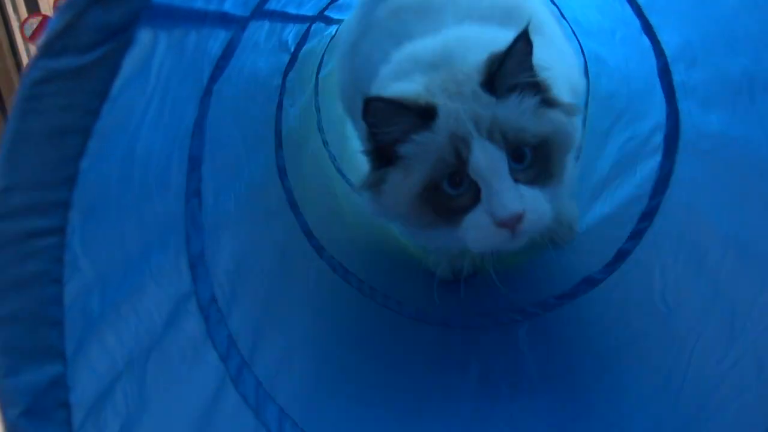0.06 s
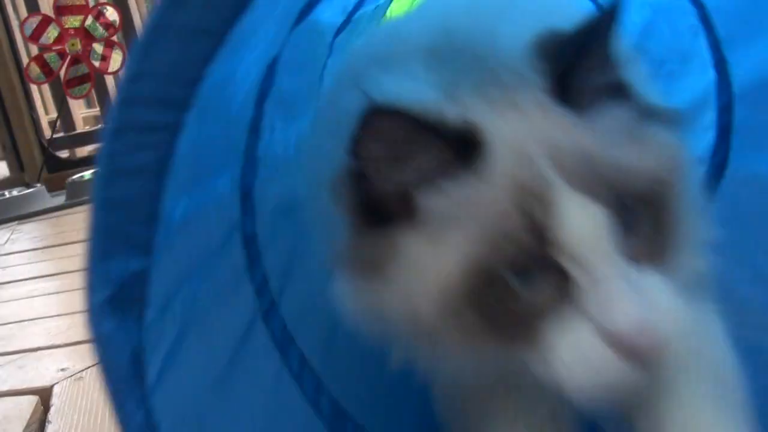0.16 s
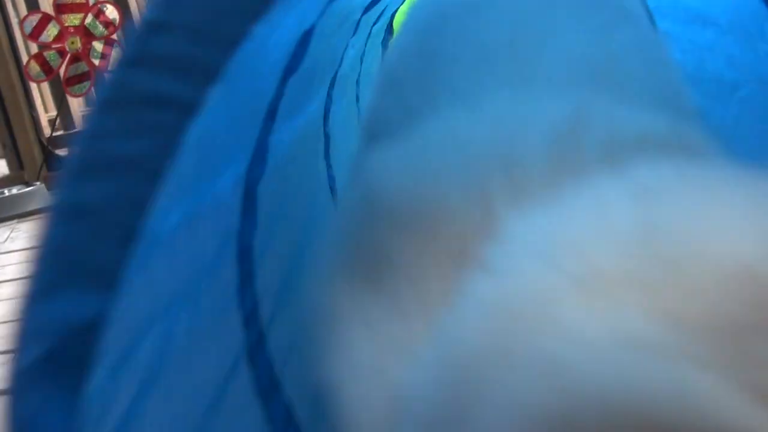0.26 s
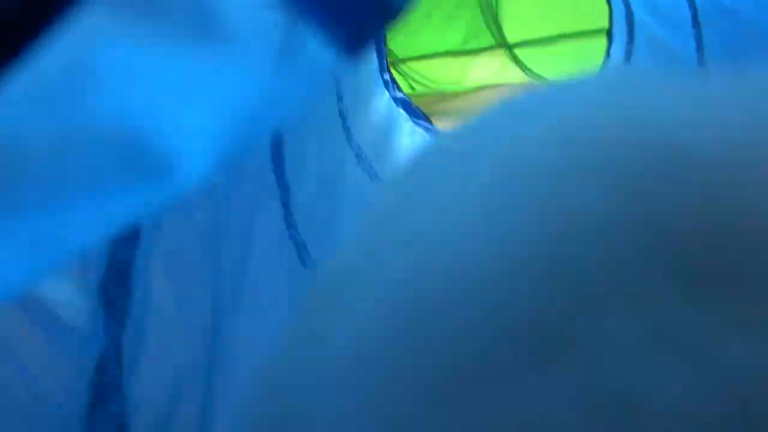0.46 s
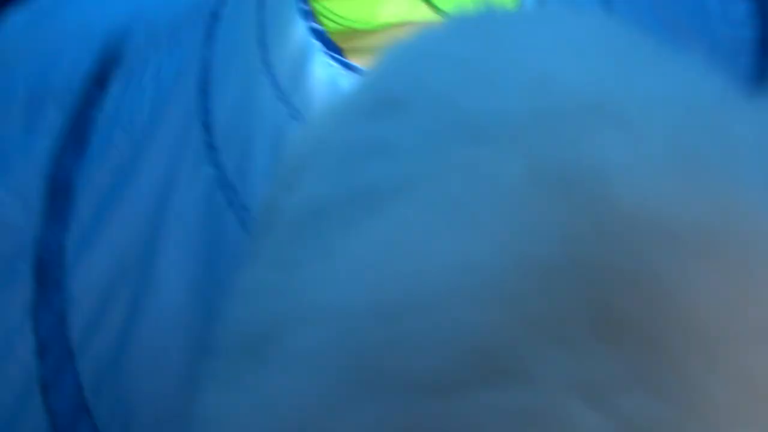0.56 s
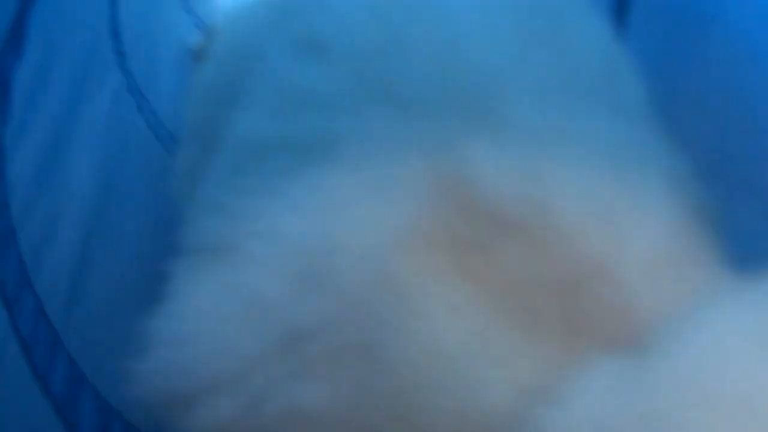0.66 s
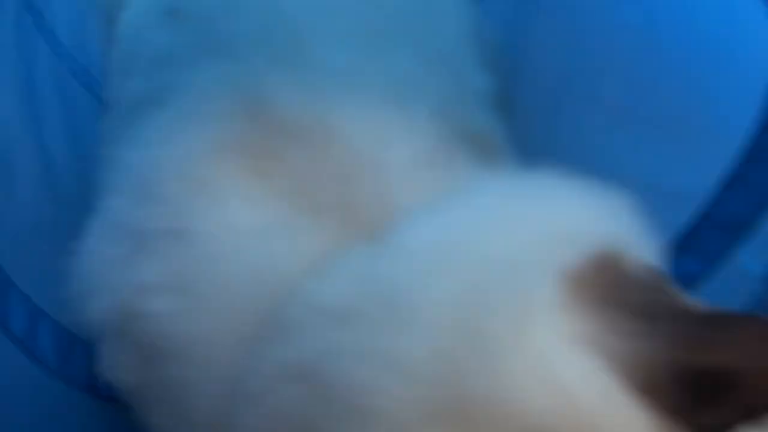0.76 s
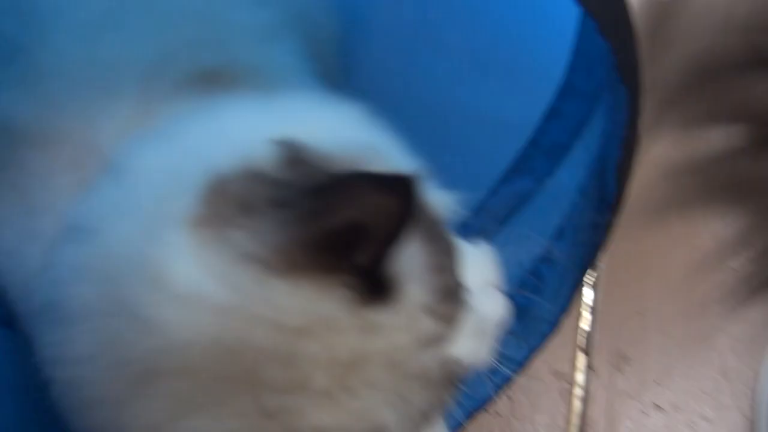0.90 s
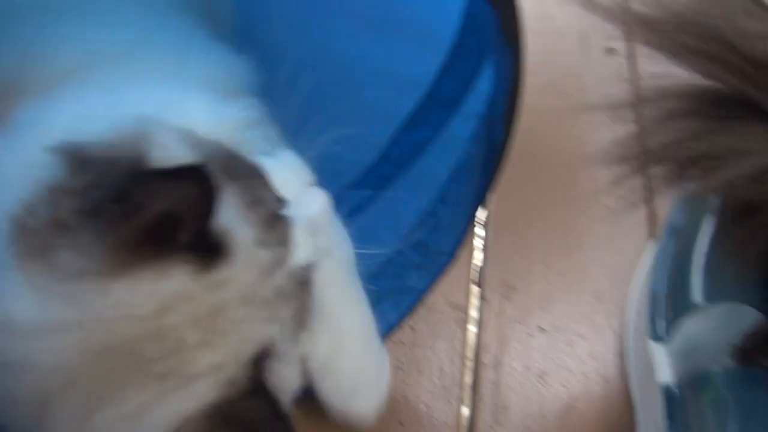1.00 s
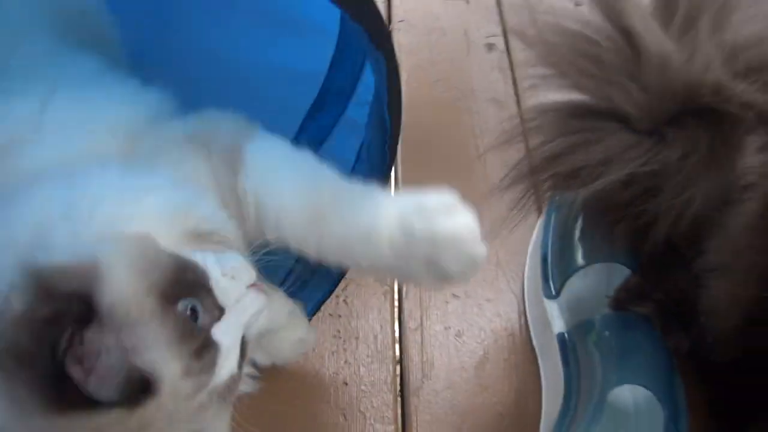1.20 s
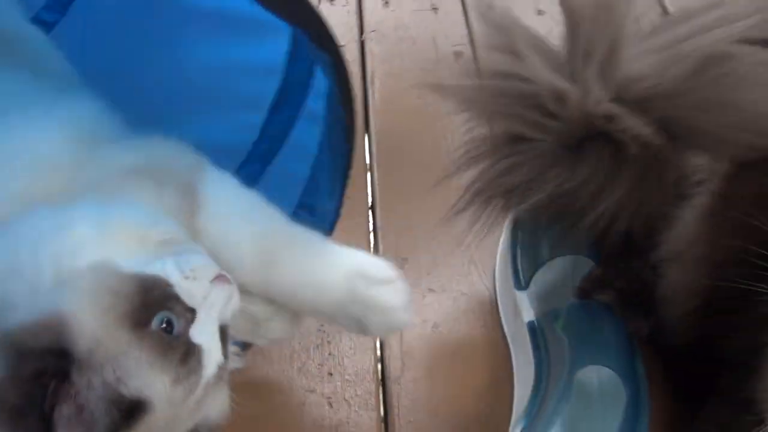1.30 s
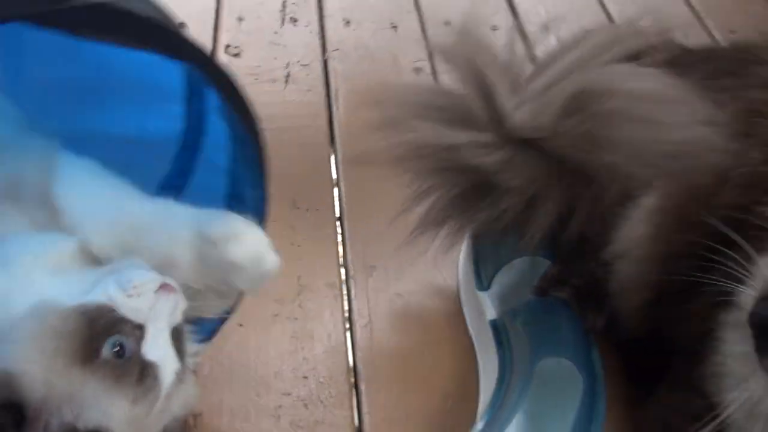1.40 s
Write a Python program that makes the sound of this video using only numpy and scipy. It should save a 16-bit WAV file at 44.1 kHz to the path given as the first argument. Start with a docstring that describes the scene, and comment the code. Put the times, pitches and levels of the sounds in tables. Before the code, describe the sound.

A fabric tunnel rustles and snaps under a running cat, with soft paw thuds.

```python
"""A cat dashes out of a nylon play tunnel on a wooden deck.
Its body rubs the cloth, which crackles, snaps taut and booms hollowly; its paws thud on the boards.
Then fur brushes softly and one claw scratches and ticks on the wood. A distant machine hums outdoors.
Rubbing is made of many tiny slips plus smooth noise, thuds and cracks are short bursts of noise,
and the booms, the tick and the hum are plain tones."""
import sys
import numpy as np
from scipy import signal
from scipy.fft import rfft, irfft
from scipy.io import wavfile
from scipy.ndimage import uniform_filter1d

SR = 44100
rng = np.random.default_rng(int(sys.argv[2]) if len(sys.argv) > 2 else 0)


def bounce(signal):
    """Save signal as a 16-bit WAV file at the path given by the first command-line argument."""
    frames = np.transpose(np.atleast_2d(signal))
    limited = np.clip(frames, -1, 1)
    pcm = np.round(limited * 32767).astype(np.int16)
    wavfile.write(sys.argv[1], SR, pcm)


N = 63945
TIME = np.arange(N) / SR

# how loudly the body rubs the cloth: time_s, level_db
RUB_LEVEL = [(0, -59), (.03, -63), (.06, -53), (.105, -75), (.12, -39.5), (.15, -42), (.18, -47),
             (.22, -46), (.25, -33), (.29, -24), (.34, -26.5), (.41, -24), (.445, -31), (.49, -28.5),
             (.545, -43.5), (.567, -35), (.585, -59), (.63, -42), (.67, -60.5), (.85, -57.5), (.925, -51),
             (.96, -53), (1.15, -59), (1.45, -53.5)]
# the rubbing's tone colour (how strong its low and high parts are): pitch_hz, level_db
CLOTH_COLOUR = [(30, -51), (110, -19), (190, -1), (370, 0), (580, 2.5), (1150, -1.5), (1440, -2.5),
                (2000, -4.5), (2900, -12), (3600, -8.5), (5200, -13.5), (8600, -24.5), (10000, -37),
                (16000, -31)]
# how wide the cloth sounds (lower is narrower): pitch_hz, width_db
CLOTH_WIDTH = [(60, -18), (125, -24), (200, -13), (330, -29), (550, -10), (950, -7), (1600, -6.5),
               (6500, -6.5), (13000, -8.5)]
def cloth():
    """Creases slip under the cat's body and crackle."""
    rubbing = friction(slips_per_s=5000, uneven_db=1, smooth_share=0.44, width=CLOTH_WIDTH)
    return colour(patchy(rubbing, depth_db=2.5) * level(RUB_LEVEL), CLOTH_COLOUR)


# how hard the cat shakes the tunnel wall: time_s, level_db
SHAKE_LEVEL = [(0, -42), (.03, -47.5), (.1, -53.5), (.15, -42.5), (.21, -55.5), (.27, -45), (.37, -38),
               (.392, -22.5), (.435, -26.5), (.49, -28.5), (.525, -32), (.56, -39), (.59, -48), (.615, -40),
               (.645, -46.5), (.68, -57)]
# the notes of the hollow tunnel: pitch_hz, bandwidth_hz, level_db
TUNNEL_NOTES = [(181, 20, -6.5), (243, 24, -3), (417.2, 20, -1), (636, 25, -6), (764, 53, -3.5),
                (967, 13, -3.5), (1314, 69, -6), (1567, 250, -7), (2255, 39, -9)]
# tone colour of the wall's rumble: pitch_hz, level_db
WALL_COLOUR = [(25, -31), (55, -39), (95, -18), (130, -22), (190, 0.5), (260, 0.5), (330, -10), (700, -2.5),
               (1500, -21.5), (5000, -53.5)]
# how wide the tunnel sounds: pitch_hz, width_db
TUNNEL_WIDTH = [(60, -22), (130, -16), (190, -13), (245, -18), (300, -7), (480, 5), (620, -31), (760, -16),
                (1050, -26), (1400, -3.5)]
def tunnel():
    """The shaken wall rumbles and makes the hollow tunnel ring."""
    shaking = friction(slips_per_s=2200, uneven_db=2.0, smooth_share=0.49, width=TUNNEL_WIDTH)
    ring = 0
    for hz, bandwidth_hz, db in TUNNEL_NOTES:
        note_filter = signal.iirpeak(hz, hz / bandwidth_hz, SR)
        ring = ring + amp(db) * unit(signal.lfilter(*note_filter, shaking))
    rumble = colour(shaking, WALL_COLOUR)
    return (amp(-2) * unit(ring) + amp(-5.5) * rumble) * level(SHAKE_LEVEL)


# the cat bumping the tunnel wall: start_s, length_s, level_db, pitch_hz
WALL_BUMPS = [(.395, .085, -23.5, 183.4), (.47, 0.053, -28, 176), (0.495, 0.069, -30, 221),
              (.597, 0.067, -36, 184)]
# its weight landing on the deck: start_s, level_db
DECK_THUMPS = [(.23, -44), (0.379, -42.5), (0.453, -41.5), (0.621, -44.5)]
def bumps():
    """The wall bends, so each bump booms at its own pitch; the deck thumps under the cat."""
    out = np.zeros((2, N))
    for start_s, length_s, db, hz in WALL_BUMPS:
        add(out, start_s, amp(db) * boom(hz, length_s))
    for start_s, db in DECK_THUMPS:
        add(out, start_s, amp(db) * boom(hz=87, length_s=0.039))
    return out


# sharp cracks: start_s, level_db, brightness_db_per_octave
CRACKS = [(0.1155, -39, 9), (0.2306, -33, 3), (0.2445, -32, 0), (0.3837, -18, -0.5), (0.3863, -10, -0.5),
          (0.4002, -13.5, 1.5), (0.403, -25, 2.5), (0.5618, -25.5, 2), (0.6845, -36.5, 0),
          (1.2172, -36.5, 0)]
# tone colour of a crack: pitch_hz, level_db
CRACK_COLOUR = [(40, -41), (200, -4.5), (1300, 4), (2800, -1.5), (4000, -4), (6000, -10.5), (8800, -9),
                (10000, -19), (16000, -29)]
# how wide a crack sounds: pitch_hz, width_db
CRACK_WIDTH = [(200, -21), (900, 1), (4000, -5), (8000, -6.5)]
def cracks():
    """Sharp cracks with a brief tail: cloth snapping taut and, last, a claw scratching the boards."""
    rise_s, fade_s, tail_s = 0.00057, 0.0013, 0.0042
    out, t = np.zeros((2, N)), TIME[:SR // 10]
    crack = np.exp(-np.maximum(t - rise_s, 0) / fade_s)
    tail = amp(-15) * np.exp(-t / tail_s)
    loudness = np.minimum(t / rise_s, 1) * (crack + tail)
    for start_s, db, brightness in CRACKS:
        add(out, start_s, amp(db) * burst(loudness, CRACK_COLOUR, CRACK_WIDTH, brightness))
    return out


# paws landing: start_s, level_db, pitch_hz
PAW_STEPS = [(.045, -36, 514), (.049, -39, 1100), (0.1181, -37.5, 298), (0.136, -34, 315),
             (.146, -40.5, 576), (0.231, -30.5, 330), (0.257, -30.5, 404), (.289, -24, 580),
             (.386, -26.5, 330), (0.469, -34.5, 616), (0.608, -37.5, 422), (.624, -36, 398),
             (1.211, -42, 800), (1.2157, -38.5, 846)]
# tone colour of a thud: multiple_of_pitch, level_db
THUD_COLOUR = [(.04, -22), (.2, -12), (.5, -5.5), (1, 3), (1.8, -5.5), (3.5, -25), (20, -37)]
# how wide the boards sound: pitch_hz, width_db
BOARD_WIDTH = [(120, -22), (220, -31), (400, -25), (900, -25), (2000, -14)]
def paws():
    """Soft pads thud on cloth and boards, each at its own pitch."""
    rise_s, fade_s = 0.00054, 0.011
    out, t = np.zeros((2, N)), TIME[:SR // 10]
    loudness = np.minimum(t / rise_s, 1) * np.exp(-np.maximum(t - rise_s, 0) / fade_s)
    for start_s, db, hz in PAW_STEPS:
        add(out, start_s, amp(db) * burst(loudness, np.array(THUD_COLOUR) * [hz, 1], BOARD_WIDTH))
    return out


# scraping strokes: middle_s, half_length_s, level_db
SCRAPES = [(0.236, 0.0044, -38), (0.336, 0.025, -31), (0.561, 0.02, -38.5), (0.919, 0.06, -50)]
# tone colour of a scrape: pitch_hz, level_db
SCRAPE_COLOUR = [(200, -31), (900, -1), (2300, -1), (3300, 4.5), (4500, -6), (8500, -24), (10500, -16),
                 (16000, -33)]
def scrapes():
    """Paws and flanks rasp across the nylon in short strokes that swell and fade."""
    strokes = sum(amp(db) * np.exp(-2 * ((TIME - middle_s) / half_length_s) ** 2)
                  for middle_s, half_length_s, db in SCRAPES)
    rasp = friction(slips_per_s=800, uneven_db=3.5, smooth_share=0.45, width=CLOTH_WIDTH)
    return colour(rasp * strokes, SCRAPE_COLOUR)


# how loudly the fur brushes: time_s, level_db
FUR_LEVEL = [(0, -48.5), (.05, -49.5), (.1, -57), (.133, -42), (.17, -57), (.228, -47.5), (.265, -34.5),
             (.4, -36.5), (.49, -39), (.565, -43.5), (.585, -56.5), (.63, -54), (.67, -63), (.85, -59.5),
             (.9, -48.5), (.97, -56), (1.08, -52), (1.14, -59.5), (1.24, -51.5), (1.31, -59.5), (1.45, -59)]
# tone colour of its hiss: pitch_hz, level_db
FUR_COLOUR = [(300, -28), (1500, -7.5), (3600, -0.5), (5300, -4), (6800, -0.5), (7400, -7), (8600, 0),
              (9900, -13.5), (12500, -6.5), (16000, -16)]
def fur():
    """Fur slides over nylon with a fine hiss."""
    brushing = friction(slips_per_s=7700, uneven_db=2.5, smooth_share=0.86, width=CLOTH_WIDTH)
    return colour(patchy(brushing, depth_db=1.9) * level(FUR_LEVEL), FUR_COLOUR)


# the claw touching the boards: start_s, level_db
CLAW_TICKS = [(1.216, -24.5), (1.222, -36), (1.23, -41)]
# the notes in one tick: pitch_hz, level_db, ring_s (time to fade by 60 dB)
CLAW_NOTES = [(345, -17, 0.044), (710, -12.5, 0.02), (1370, -7, 0.0097), (3340, -7, 0.0047),
              (7000, -4.5, 0.0071), (8270, 3, 0.0031), (8760, -4, 0.0043), (11200, -2, 0.0025)]
def claw():
    """A claw ticks on wood and skips twice."""
    rise_s = 0.000093
    out, t = np.zeros((2, N)), TIME[:SR // 20]
    tick = sum(amp(db - 60 * t / ring_s) * np.sin(2 * np.pi * hz * t) for hz, db, ring_s in CLAW_NOTES)
    for start_s, db in CLAW_TICKS:
        add(out, start_s, amp(db) * tick * np.minimum(t / rise_s, 1))
    return out


def echoes(sound, ring_s=0.26, delay_s=0.003):
    """Sound bounces off the deck and its railing as many faint, quick echoes."""
    t = TIME[:SR // 3]
    bounces = rng.standard_normal((2, len(t))) * (rng.random((2, len(t))) < .1)
    tail = bounces * amp(-60 * t / ring_s) * (t > delay_s)
    return amp(-14) * signal.fftconvolve(sound, tail / np.linalg.norm(tail[0]), axes=1)[:, :N]


# tone colour of the outdoor air: pitch_hz, level_db
AIR_COLOUR = [(25, -18), (80, -12), (160, -3), (230, -6), (330, -4), (480, -9.5), (720, -5), (1100, -6),
              (1400, -9), (2300, -15.5), (4000, -25), (7500, -29), (8700, -39), (10200, -36), (12500, -35),
              (16000, -46)]
# how wide the air sounds: pitch_hz, width_db
AIR_WIDTH = [(60, -28), (140, -16), (220, -15), (310, -7), (520, -0.5), (850, -10), (1500, -4), (4000, -6),
             (12000, -5)]
def air():
    """The outdoor air is a soft, steady rush."""
    return colour(spread(rng.standard_normal((2, N)), AIR_WIDTH), AIR_COLOUR) * amp(-52)


# the machine's notes: pitch_hz, level_db, left_ear_lead_radians
HUM_NOTES = [(111, -68, 0.05), (235.4, -60, 0.9), (305, -70.5, 1), (590, -62.5, 0.1), (1057, -57, 0.8),
             (1180, -66, 0.4)]
def machine(waver_hz=1.41):
    """A distant machine hums, each note wavering slightly in pitch."""
    out = np.zeros((2, N))
    for hz, db, lead in HUM_NOTES:
        waver = unit(uniform_filter1d(rng.standard_normal(N), size=4000))
        angle = 2 * np.pi * (np.cumsum(hz + waver_hz * waver) / SR + rng.random())
        out += amp(db) * np.sqrt(2) * np.sin([angle + lead, angle])
    return out


def friction(slips_per_s, uneven_db, smooth_share, width):
    """Rubbing: tiny slips of uneven size over smooth sliding noise."""
    slips = amp(uneven_db * np.minimum(rng.exponential(1, (2, N)), 4)) * rng.choice([-1, 1], (2, N))
    slips *= rng.random((2, N)) < slips_per_s / SR
    sliding = rng.standard_normal((2, N))
    return spread(np.sqrt(1 - smooth_share) * unit(slips) + np.sqrt(smooth_share) * sliding, width)


def patchy(sound, depth_db, size=256):
    """Lets patches of low and high sound swell and fade as folds shift."""
    bands = signal.stft(sound, nperseg=size)[2]
    patches = uniform_filter1d(rng.standard_normal(bands.shape[1:]), size=7, axis=0)  # blur over pitch
    patches = unit(uniform_filter1d(patches, size=5, axis=1))  # blur over time
    return unit(signal.istft(bands * amp(depth_db * patches), nperseg=size)[1][:, :N])


def boom(hz, length_s, swell_share=0.25):
    """A low note that swells under a soft push and dies away."""
    t = np.arange(0, length_s, 1 / SR)
    swell = np.sin(np.pi * np.interp(t / length_s, [0, swell_share, 1], [0, .5, 1])) ** 2
    return swell * np.sin(2 * np.pi * hz * t)


def burst(loudness, tone_colour, width, brightness=0):
    """The short noise of one hit, following a loudness curve."""
    noise = spread(rng.choice([-1., 1.], (2, len(loudness))), width)
    hit = colour(noise * loudness, tone_colour, brightness)
    return unit(hit) * np.sqrt(np.mean(loudness ** 2))


def colour(sound, table, brightness=0, size=2048):
    """Gives a sound a tone colour; brightness adds treble, in dB per octave."""
    hz = abs(np.fft.fftfreq(size, 1 / SR))
    log_gain = np.log(amp(read(table, hz) + brightness * np.log2(hz + 20)))
    taps = np.fft.ifft(np.exp(np.conj(signal.hilbert(log_gain)))).real  # rings only after a hit
    return signal.fftconvolve(sound, taps[None] / np.linalg.norm(taps), axes=1)[:, :sound.shape[1]]


def spread(pair, width):
    """Turns two unrelated noises into left and right; width is the side level minus the middle."""
    size = pair.shape[1]
    wide = amp(read(width, np.fft.rfftfreq(size, 1 / SR)))
    middle, side = rfft(pair) / np.sqrt(1 + wide ** 2)
    return irfft([middle + wide * side, middle - wide * side], size)


def lean(sound, table):
    """Leans each range of pitch to the left or right."""
    gain = amp(read(table, np.fft.rfftfreq(N, 1 / SR)) / 2)
    return irfft(rfft(sound) * [gain, 1 / gain], N)


def amp(db):
    """Turns decibels into a number to multiply by."""
    return 10 ** (np.asarray(db) / 20)


def unit(sound):
    """Scales a sound to an average power of 1."""
    return sound / np.sqrt(np.mean(sound ** 2) + 1e-20)


def read(table, hz):
    """Looks up a table at any pitch, blending between its rows."""
    pitches, values = np.transpose(table)
    return np.interp(np.log(hz + 1), np.log(pitches + 1), values)


def level(table):
    """Joins a table of times and levels into a loudness curve."""
    return amp(np.interp(TIME, *np.transpose(table)))


def add(mix, start_s, sound):
    """Mixes a sound in at its start time."""
    part = mix[:, max(round(start_s * SR), 0):][:, :sound.shape[-1]]
    part += sound[..., :part.shape[-1]]


# which side the rubbing leans to: pitch_hz, left_minus_right_db
RUB_BALANCE = [(100, 1), (320, -4.5), (550, 2), (1300, -2), (3000, 0.5), (7000, -0.5), (13000, 0)]
def scene():
    """Rubbing, the booming tunnel, and hits with their echoes, over the background."""
    hits = paws() + cracks() + claw()
    rubbing = lean(cloth() + fur() + scrapes(), RUB_BALANCE)
    return rubbing + tunnel() + bumps() + hits + echoes(hits) + air() + machine()


def record(dry, top_hz=15900):
    """Cuts away the very highest treble."""
    treble_cut = signal.firwin(511, top_hz, window=("kaiser", 9), fs=SR)
    return signal.oaconvolve(dry, treble_cut[None], "same")


dry = scene()
out = record(dry)
bounce(out)
```